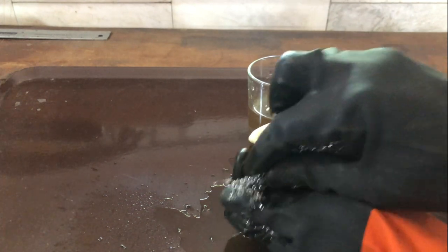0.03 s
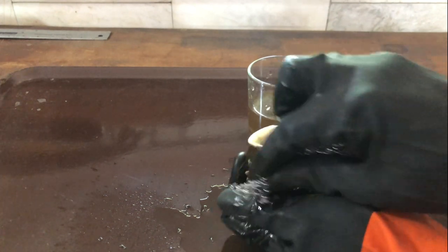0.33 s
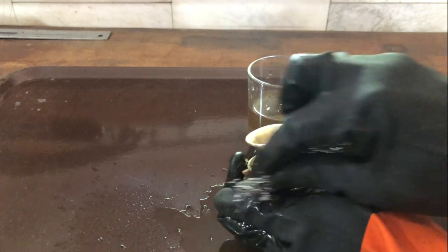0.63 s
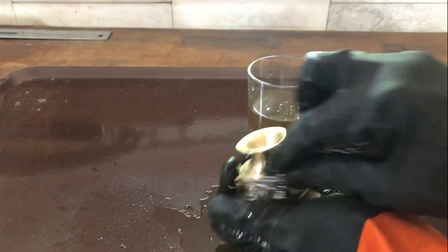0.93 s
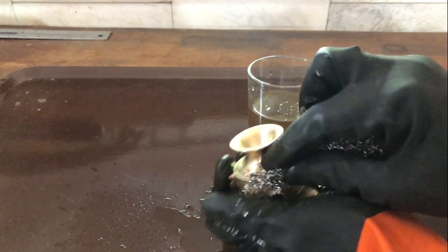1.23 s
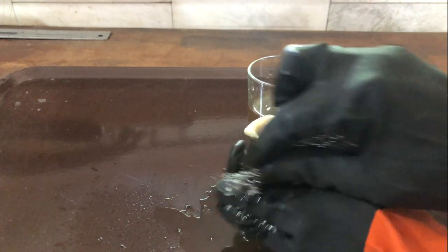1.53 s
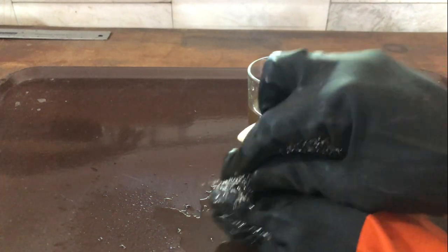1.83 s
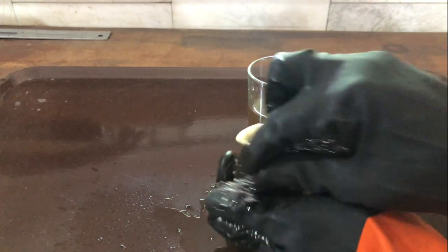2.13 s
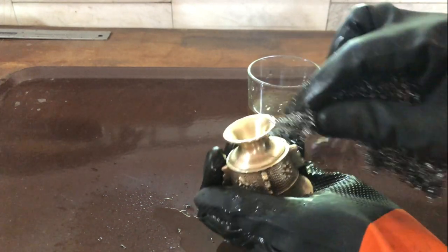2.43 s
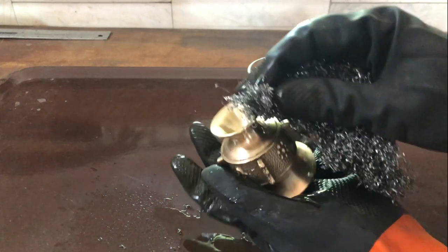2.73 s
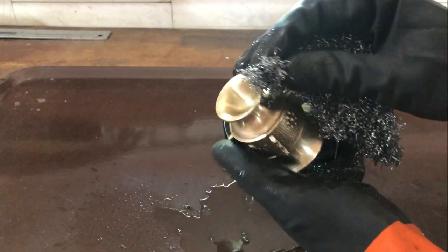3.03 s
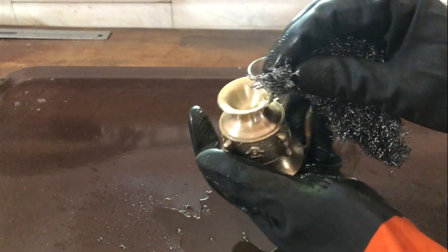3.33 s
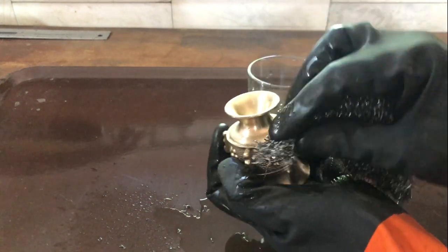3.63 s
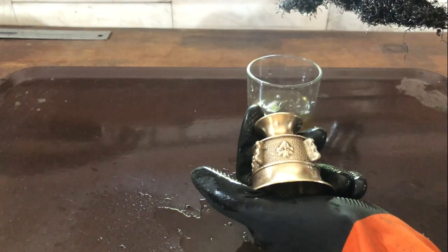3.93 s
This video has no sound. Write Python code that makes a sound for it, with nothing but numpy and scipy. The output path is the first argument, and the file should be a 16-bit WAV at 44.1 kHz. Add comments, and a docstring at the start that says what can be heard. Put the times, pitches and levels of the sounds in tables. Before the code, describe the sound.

Wet metal wool scrubs a small brass vase close up, in quick, bright, scratchy strokes from the start until about 2.3 seconds, with sharp wire snaps near 0.6 and 0.8. From 2.5 seconds come quieter, scattered scrapes with soft squelches, a faint squeak near 2.9 and a thin wire ring around 3.4. The sound cuts off at 3.7 seconds, and faint room tone follows.

```python
"""Wet metal wool on a brass vase

A wet pad scrubs a small vase held in rubber gloves, close by in a workshop. Hard back-and-forth
strokes are swarms of tiny wire slips; then the vase is turned and scraped lightly, the pad squelches
and squeaks, and plucked strands ring. The sound cuts out and returns as bare room tone."""
import sys
import numpy as np
from scipy import signal
from scipy.fft import rfft, irfft, next_fast_len
from scipy.io import wavfile
from scipy.ndimage import uniform_filter1d, map_coordinates

SR = 44100
rng = np.random.default_rng(int(sys.argv[2]) if len(sys.argv) > 2 else 0)


def wrap_up_sound(samples):
    """Save the sound to the file named by the first command line argument, as 16-bit audio."""
    columns = np.atleast_2d(samples).T
    # keep every value between -1 and 1, then stretch to whole-number steps
    tamed = np.clip(columns, -1, 1)
    steps = np.round(tamed * 32767).astype(np.int16)
    wavfile.write(sys.argv[1], SR, steps)


N = 176400
T = np.arange(N) / SR


def amp(db):
    """Decibels to gain."""
    return 10 ** (np.asarray(db) / 20)


def unit(x):
    """Scale to rms 1."""
    return x / np.sqrt(np.mean(x ** 2) + 1e-20)


def level(rows):
    """Gain per sample from (t/s, level/dB) points."""
    return amp(np.interp(T, *np.transpose(rows)))


def dips(times_s, depth_db, half_s):
    """Gain with a Gaussian dip at each time."""
    return amp(-depth_db * sum(np.exp(-((T - s) / half_s) ** 2) for s in times_s))


def wobble(knots_per_s, size=N):
    """Smooth random curve."""
    return map_coordinates(rng.standard_normal(8000), [T[:size] * knots_per_s], mode='wrap')


def filtered(x, response):
    """Apply a frequency response."""
    size = next_fast_len(N + SR // 2)
    return irfft(rfft(x, size) * response(np.fft.rfftfreq(size, 1 / SR)), size)[:N]


def coloured(x, points, size=4096):
    """Minimum-phase filter of unit energy, shaped by (f/Hz, level/dB) points."""
    hz, db = np.transpose(points)
    shape_db = np.interp(np.log(np.fft.rfftfreq(size, 1 / SR) + 1), np.log(hz), db)
    cepstrum = irfft(np.log(amp(shape_db)))
    cepstrum[1:size // 2] *= 2
    cepstrum[size // 2 + 1:] = 0
    impulse = irfft(np.exp(rfft(cepstrum)))
    return signal.fftconvolve(x, impulse / np.linalg.norm(impulse))[:N]


def resonate(x, modes):
    """Parallel resonances (f/Hz, width/Hz, level/dB)."""
    return filtered(x, lambda f: sum(amp(db) * 1j * f * width / (hz * hz - f * f + 1j * f * width)
                                     for hz, width, db in modes))


def slips(rate_per_s, spread_db):
    """Random tiny impulses of uneven size, rms 1."""
    chance = np.clip(rate_per_s / SR, 1e-4, 1)
    size = amp(spread_db * np.clip(rng.standard_normal(N), -2, 2)) * rng.choice([-1, 1], N)
    return unit((rng.random(N) < chance) * size / np.sqrt(chance))


def deforming(x, depth_db, size=512):
    """Resonances come and go as the pad deforms."""
    spectra = signal.stft(x, nperseg=size)[2]

    def patches(bins, frames):
        across_bins = uniform_filter1d(rng.standard_normal(spectra.shape), bins, axis=0)
        return unit(uniform_filter1d(across_bins, frames, axis=1))

    gain = amp(depth_db * patches(3, 5) + 0.9 * patches(36, 4))
    return signal.istft(spectra * unit(gain), nperseg=size)[1][:N]


# Room tone spectrum under the work: f/Hz, relative level/dB
ROOM_SPECTRUM = [(20, -36.5), (49, 2), (65, -8), (300, -16), (1000, -26.5), (15000, -46.5)]
# Handling rumble envelope: t/s, level/dB
RUMBLE_LEVEL = [(0, -74), (.5, -59.5), (1.2, -68.5), (1.9, -61.5), (2.3, -74)]
# Handling rumble spectrum: f/Hz, relative level/dB
RUMBLE_SPECTRUM = [(20, -35), (48, -2), (62, -14.5), (300, -60.5)]
def background(room_db=-61):
    """Steady room tone and a swelling low rumble of handling."""
    room = amp(room_db) * coloured(rng.standard_normal(N), ROOM_SPECTRUM)
    return room + level(RUMBLE_LEVEL) * coloured(rng.standard_normal(N), RUMBLE_SPECTRUM)


# Closing room tone spectrum: f/Hz, relative level/dB
BARE_ROOM_SPECTRUM = [(30, -8.5), (330, -9.5), (800, -15.5), (2800, -32), (4700, -22.5), (7000, -32.5),
                      (15000, -42)]
def bare_room(level_db=-57.5):
    """Steady, brighter room tone."""
    return amp(level_db) * coloured(rng.standard_normal(N), BARE_ROOM_SPECTRUM)


def workshop(x, t60_s=0.092, echo_db=-14.5):
    """Add a short echo from bench and tiled wall."""
    t = np.arange(SR // 2) / SR
    tail = rng.standard_normal(len(t)) * amp(-60 * t / t60_s) * (t > 0.002)
    return x + amp(echo_db) * signal.fftconvolve(x, tail / np.linalg.norm(tail))[:N]


# Wire end modes: f/Hz, relative level/dB
STRAND_MODES = [(8226, -9), (10212, -6), (10955, -1), (14982, -1)]
# Plucks: t/s, level/dB, tilt about 11 kHz/(dB/octave)
STRAND_PLUCKS = [(3.421, -40, 12), (3.572, -47, 9.12)]
# Loose ends brushing the rim: t/s, level/dB re shimmer_db
SHIMMER_LEVEL = [(2.55, -18), (2.95, -2), (3.1, -14), (3.2, 5), (3.27, -8), (3.5, -8)]
def strands(t60_s=0.18, shimmer_db=-54.5, width_hz=60.4):
    """Wire ends ring thinly when plucked and shimmer when brushed."""
    plucked, t = np.zeros(N + SR), np.arange(SR // 2) / SR
    envelope = (1 - np.exp(-t / 0.0057)) * amp(-60 * t / t60_s)
    for s, db, tilt_db in STRAND_PLUCKS:
        for hz, mode_db in STRAND_MODES:
            gain = amp(db + mode_db + tilt_db * np.log2(hz / 11000) + rng.normal(0, 1))
            plucked[round(s * SR):][:len(t)] += gain * envelope * np.sin(2 * np.pi * hz * t)
    brushed = resonate(slips(500, spread_db=8), [(hz, width_hz, db) for hz, db in STRAND_MODES[:-1]])
    shimmer = unit(brushed * amp(2.5 * wobble(22)))
    return plucked[:N] + amp(shimmer_db) * level(SHIMMER_LEVEL) * shimmer


# Squeaks: t/s, time to fall by fade_db/s, level/dB
RIM_SQUEAKS = [(2.921, 0.14, -47), (3.638, .07, -49)]
# Squeak resonances: f/Hz, width/Hz, relative level/dB
RIM_MODES = [(3499.2, 500, -10), (4660, 60, 3.5), (4800, 140, -3)]
def squeaks(chatter_hz=52, fade_db=9, attack_s=0.0092):
    """The pad chatters over the rim in fading pulses."""
    envelope = sum(amp(db - fade_db * np.maximum(T - s, 0) / fade_s) * np.clip((T - s) / attack_s, 0, 1)
                   for s, fade_s, db in RIM_SQUEAKS)
    chatter = amp(1.2985 * np.sin(2 * np.pi * chatter_hz * T + wobble(28)))
    return envelope * unit(resonate(chatter * rng.standard_normal(N), RIM_MODES))


# Squelch envelope: t/s, level/dB
SQUELCH_LEVEL = [(0, -62.5), (2.53, -56.5), (2.63, -47), (2.76, -56), (2.96, -51.5), (3.03, -62.5),
                 (3.2, -64), (3.38, -53.5), (3.46, -60), (3.69, -57)]
# Squelch spectrum: f/Hz, relative level/dB
SQUELCH_SPECTRUM = [(100, -10.5), (350, -5), (600, -10.5), (830, -2.5), (1050, -6), (1250, 2), (1550, 0),
                    (2000, -6.5), (3500, -13), (15000, -42)]
# Liquid pops: t/s, level/dB, f/Hz
LIQUID_POPS = [(2.295, -29, 1734), (2.962, -41, 430), (2.986, -40, 900), (3.336, -38.5, 1011),
               (3.393, -39, 1520)]
def squelch(pop_t60_s=0.03):
    """Liquid crackles in the squeezed pad, with a few larger pops."""
    crackle = coloured(slips(1800, spread_db=5.5) * amp(1.1 * wobble(70)), SQUELCH_SPECTRUM)
    out = level(SQUELCH_LEVEL) * unit(deforming(crackle, depth_db=2.5))
    for s, db, hz in LIQUID_POPS:
        t = np.maximum(T - s, 0)
        envelope = amp(db - 60 * t / pop_t60_s) * (1 - np.exp(-t / 0.00019))
        out += envelope * np.sin(2 * np.pi * hz * t + 2 * wobble(900))
    return out


# Glassy zings: centre t/s, level/dB, lowest f/Hz
GLASSY_ZINGS = [(0.135, -50, 1500), (0.329, -37, 1955), (0.48, -39, 2730), (0.779, -44.5, 1550),
                (1.843, -38.5, 1511), (1.905, -51, 2500), (1.992, -35, 1850), (3.207, -48.5, 2160),
                (3.4, -52, 1487)]
def zings(count=18, span_hz=11500, half_s=0.015, jitter_rad=0.45):
    """Brief glassy clusters: rough, unevenly spaced partials above a lowest one."""
    out, t = np.zeros(N), np.arange(-SR // 16, SR // 16) / SR
    envelope = np.exp(-(t / half_s) ** 2)
    for s, db, low_hz in GLASSY_ZINGS:
        hz = np.r_[low_hz, low_hz + span_hz * (np.arange(count) + rng.random(count) + 0.5) / count]
        jitter = jitter_rad * np.array([wobble(300, size=len(t)) for _ in hz])
        partials = np.sin(2 * np.pi * (hz[:, None] * t + rng.random((len(hz), 1))) + jitter)
        gains = np.r_[np.sqrt(2), amp(2 * rng.standard_normal(count))]
        out[round((s + t[0]) * SR):][:len(t)] += amp(db) * envelope * unit(gains @ partials)
    return out


def ticks(count=4000, rate_per_s=260, centre_hz=8640, decay_cycles=2.6):
    """Single wires flick free, each giving a few cycles at its own pitch."""
    gap_draw, phase = rng.random((count, 2)).T[:, :, None]
    pitch_draw, size_draw = rng.standard_normal((count, 2)).T[:, :, None]
    starts = (np.cumsum(-np.log(gap_draw), axis=0) * SR / rate_per_s).astype(int)
    hz = np.clip(centre_hz * np.exp(0.28 * pitch_draw), 5000, 15500)
    samples = np.arange(160)
    cycles = hz * samples / SR
    envelopes = amp(6.9 * np.clip(size_draw, -2, 2)) * np.exp(-cycles / decay_cycles)
    waves = envelopes * np.sin(2 * np.pi * (cycles + phase))
    return unit(np.bincount((starts + samples).ravel(), waves.ravel(), N)[:N])


# Rasp spectrum: f/Hz, relative level/dB
RASP_SPECTRUM = [(60, -14.5), (150, -7.5), (400, -10), (580, -7), (1000, -13.5), (1300, -2.5), (2000, -2),
                 (6000, -5), (15000, -46.5)]
# Vase resonances: f/Hz, width/Hz, relative level/dB
VASE_MODES = [(573, 70, -5), (1553, 15, 1), (3950, 1200, -10.5), (4630, 33, -2.5)]
def rasp(effort, judder, exponent=0.56):
    """Lower slip noise rings the vase; it grows more slowly than the effort."""
    clumps = unit(judder * amp(1.96 * wobble(300)))
    friction = effort ** exponent * clumps * slips(5000, spread_db=2.5)
    rub = deforming(coloured(friction, RASP_SPECTRUM), depth_db=3)
    return rub + resonate(rub, VASE_MODES)


# Wire slip and snap spectrum: f/Hz, relative level/dB
WIRE_SPECTRUM = [(300, -29), (3000, -13), (4800, -7.5), (6000, -2), (8500, 0.5), (11700, -1), (13500, -4.5),
                 (15800, -7.5)]
def scratch(effort, judder):
    """Wires slip in bright clumps, denser and louder with effort."""
    clumps = unit(judder * amp(2.64 * wobble(1300)))
    friction = effort * clumps * slips(2000 + 9000 * effort, spread_db=4.5)
    return deforming(coloured(friction, WIRE_SPECTRUM), depth_db=3.5)


# Snags letting go: t/s, burst level/dB
WIRE_SNAGS = [(0.091, -31), (0.2727, -34), (0.3958, -29.5), (0.431, -29), (0.502, -28), (0.597, -26),
              (0.612, -15), (0.6155, -17), (.7085, -27), (0.758, -23), (0.843, -15), (0.912, -31.5),
              (1.045, -27), (1.268, -29), (1.5604, -33.5), (2.014, -24), (2.2758, -22), (2.304, -20),
              (2.69, -30), (3.1934, -32), (3.336, -37)]
def snags(decay_s=0.0006):
    """A strand catches and snaps free."""
    bursts = sum(amp(db) * (T >= s) * np.exp(-np.abs(T - s) / decay_s) for s, db in WIRE_SNAGS)
    return coloured(bursts * rng.standard_normal(N), WIRE_SPECTRUM)


def stroke(start_s, peak_s, end_s, sharpness=1.18):
    """A stroke gathers speed and slows towards the turn."""
    rise = (T - start_s) / (peak_s - start_s)
    fall = (end_s - T) / max(end_s - peak_s, 1e-9)
    return np.sin(np.pi / 2 * np.clip(np.minimum(rise, fall), 0, 1)) ** sharpness


# Pad resting on the brass: t/s, level/dB
CONTACT_LEVEL = [(0, -55), (.14, -52.5), (.7, -46.5), (1.25, -54.5), (1.38, -46), (1.9, -54.5),
                 (2.15, -43.5), (2.31, -47.5), (2.38, -60), (2.9, -54.5), (3.07, -64.5), (3.4, -56),
                 (3.7, -66.5)]
# Hard strokes: start t/s, peak t/s, end t/s, level/dB, extra rasp effort/dB
HARD_STROKES = [(0.019, 0.085, 0.12, -37, 0.5), (0.132, 0.206, 0.26, -37.5, 1),
                (0.256, 0.35, 0.37, -36.5, 7.5), (0.359, 0.473, 0.49, -37, 2.5),
                (0.526, 0.601, 0.61, -31, -0.5), (0.634, 0.741, 0.76, -33.5, -3.5),
                (0.784, 0.831, .878, -33, -1.5), (0.906, 0.993, 1.037, -34.5, 1),
                (1.029, 1.052, 1.1417, -38.5, -5), (1.149, 1.18, 1.257, -48.5, 0),
                (1.267, 1.336, 1.3592, -32, 0), (1.38, 1.533, 1.533, -39, -2.5),
                (1.555, 1.601, 1.642, -35, 3.5), (1.648, 1.792, 1.803, -41.5, -3),
                (1.799, 1.847, 1.888, -37.5, 4.5), (1.911, 2.019, 2.037, -35, -0.5),
                (2.038, 2.103, 2.128, -31, 2.5), (2.15, 2.274, 2.328, -31.5, -1.5)]
# Light scrapes: start t/s, peak t/s, end t/s, level/dB, extra rasp effort/dB
LIGHT_SCRAPES = [(2.548, 2.578, 2.59, -44, -2.5), (2.58, 2.643, 2.78, -54, 1),
                 (2.806, 2.83, 2.86, -48.5, 1), (2.88, 2.915, 2.99, -50, -18),
                 (3.149, 3.191, 3.245, -48.5, -8), (3.335, 3.421, 3.52, -62, 7.5),
                 (3.535, 3.548, 3.615, -53, 5), (3.655, 3.676, 3.71, -46.5, -4.5)]
def wool(reference_db=-36, tick_db=-9.5, rasp_db=-9.5):
    """Contact and strokes drive the juddering pad's scratch, ticks and rasp."""
    turns = dips([row[2] for row in HARD_STROKES[:-1]], depth_db=1.5, half_s=0.0079)
    power = rasp_power = (level(CONTACT_LEVEL) * turns) ** 2
    for start_s, peak_s, end_s, db, extra_db in HARD_STROKES + LIGHT_SCRAPES:
        stroke_power = (amp(db) * stroke(start_s, peak_s, end_s)) ** 2
        power = power + stroke_power
        rasp_power = rasp_power + stroke_power * amp(extra_db) ** 2
    reference = amp(reference_db)  # level at effort 1
    effort = np.sqrt(power) / reference
    judder = amp(1.1 * wobble(110))
    bright = scratch(effort, judder)
    low = rasp(np.sqrt(rasp_power) / reference, judder)
    return reference * (bright + amp(tick_db) * effort * ticks() + amp(rasp_db) * low)


def scene(cut_s=3.695, return_s=3.892, stick_s=0.004):
    """Scrubbing over a low rumble, a gap of silence, then room tone alone; mono."""
    # The pad sticks just before each snag; the scrubbing thins under each zing.
    sticking = dips([s - stick_s for s, _ in WIRE_SNAGS], depth_db=4, half_s=stick_s)
    thinning = dips([row[0] for row in GLASSY_ZINGS], depth_db=15, half_s=0.0074)
    pad = sticking * wool() + snags() + squelch() + squeaks() + strands()
    work = thinning * workshop(pad) + zings()
    return ((work + background()) * (T < cut_s) + bare_room() * (T > return_s))[None]


def record(dry, hiss_db=-108, top_hz=15790, edge_hz=300):
    """Add a trace of hiss, then low-pass steeply."""
    def low_pass(hz):
        return np.sin(np.pi / 2 * np.clip((top_hz - hz) / edge_hz + 0.5, 0, 1)) ** 2

    return np.array([filtered(ch + amp(hiss_db) * rng.standard_normal(N), low_pass) for ch in dry])


dry = scene()
out = record(dry)
wrap_up_sound(out)
```